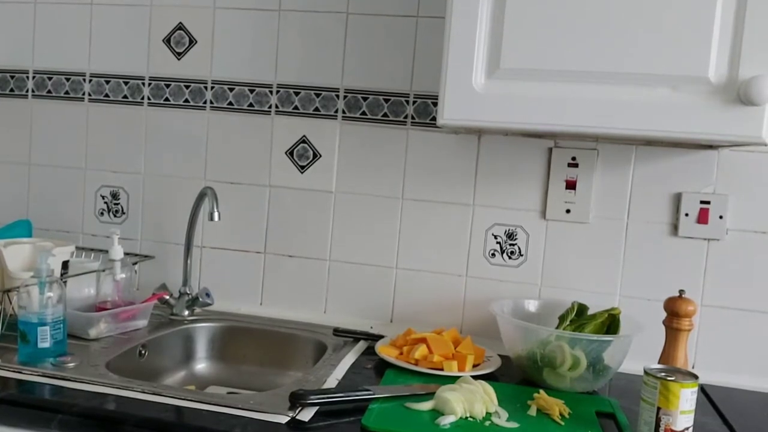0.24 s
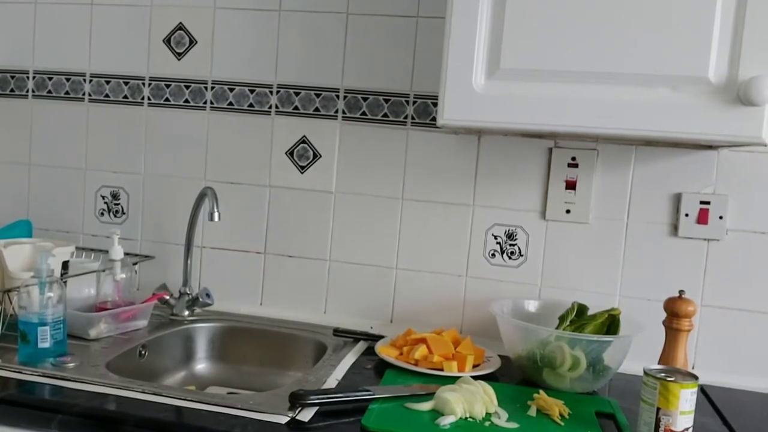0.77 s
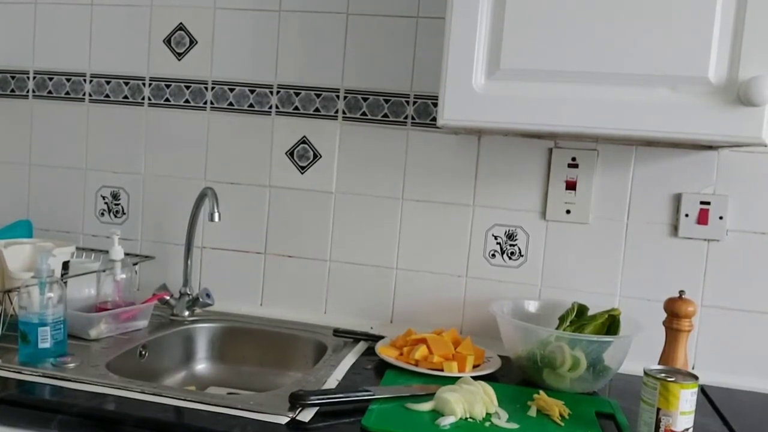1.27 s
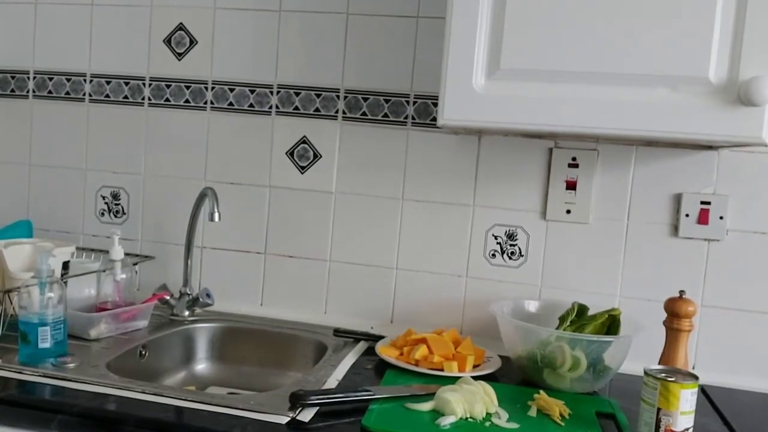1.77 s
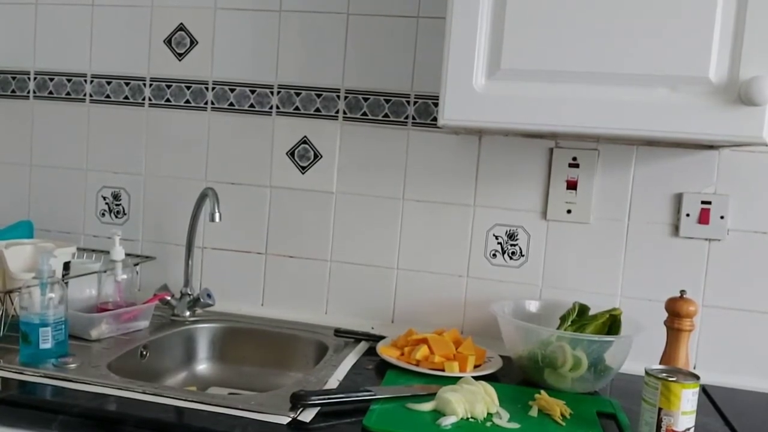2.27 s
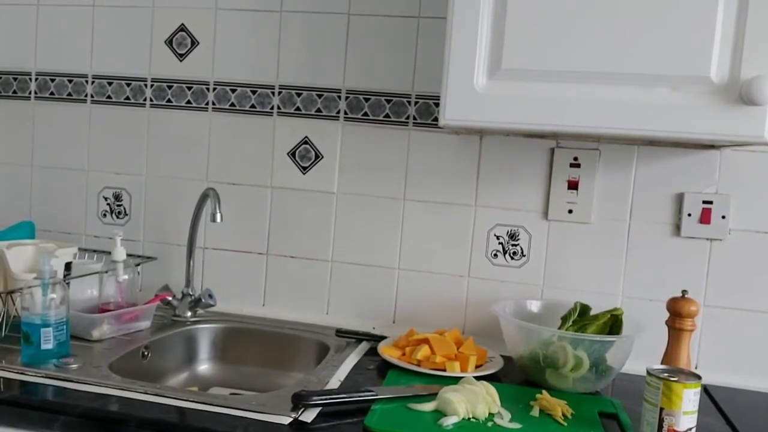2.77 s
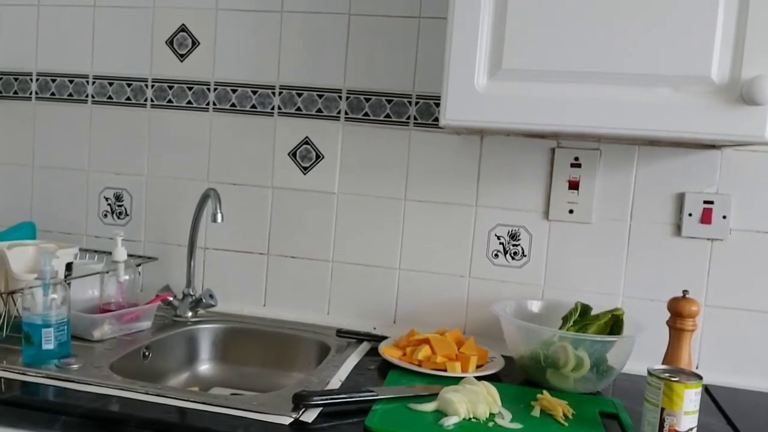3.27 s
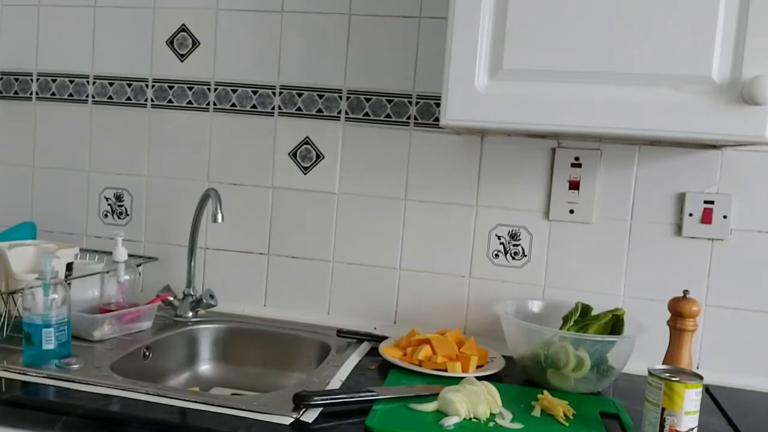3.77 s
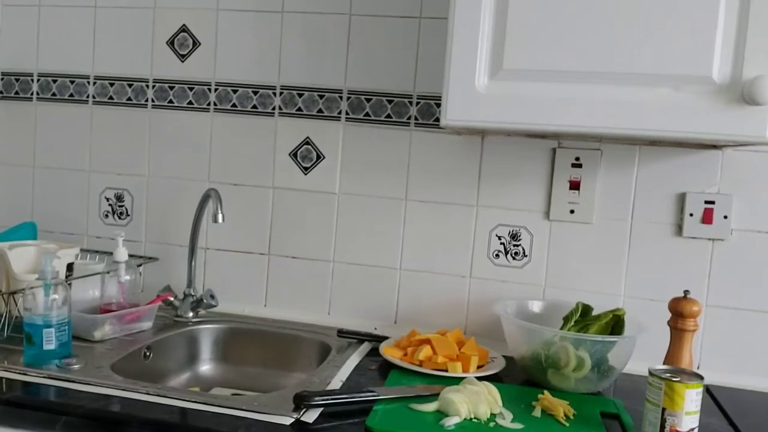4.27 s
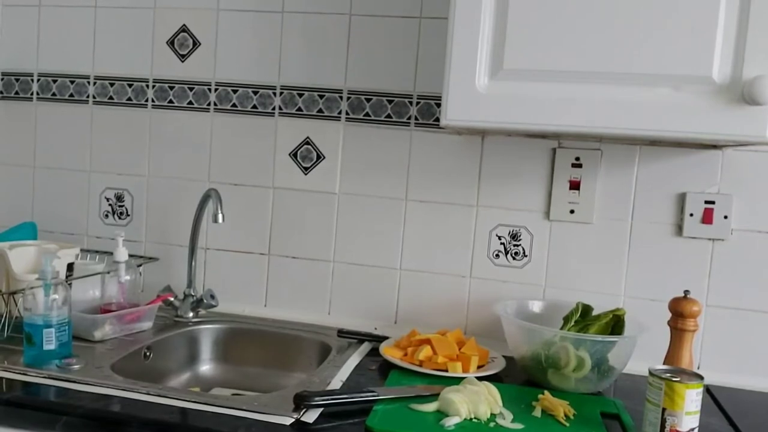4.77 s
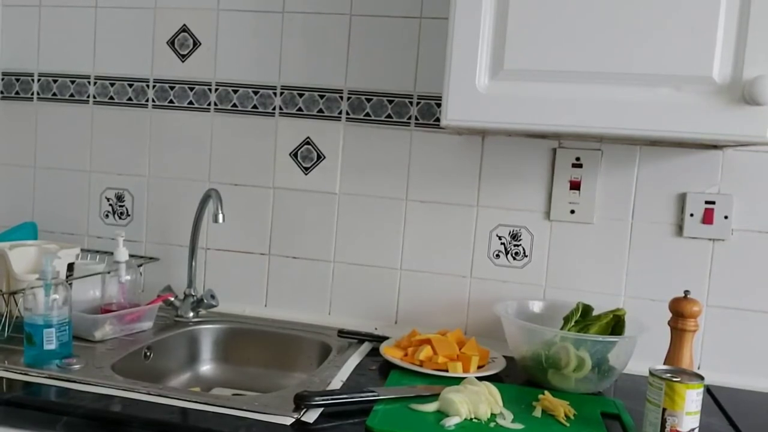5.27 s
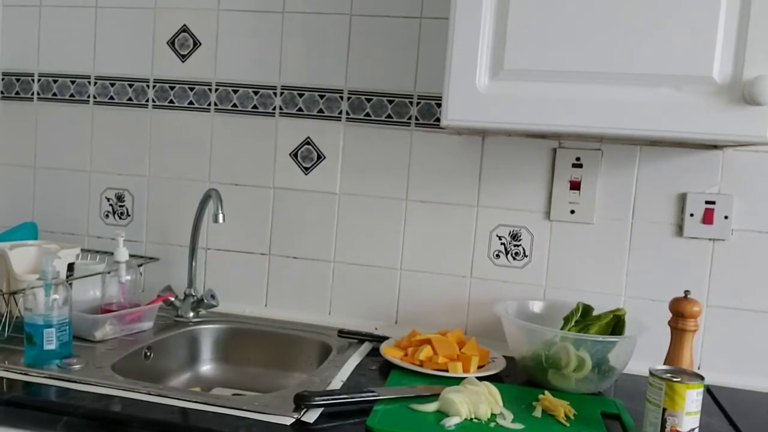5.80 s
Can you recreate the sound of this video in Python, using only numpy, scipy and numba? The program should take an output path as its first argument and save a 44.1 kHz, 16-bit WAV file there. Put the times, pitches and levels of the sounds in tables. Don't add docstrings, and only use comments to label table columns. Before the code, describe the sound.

Hollow wooden thumps with a quick chatter open the scene, then a pot lands lightly on the worktop. Dry grains crunch and trickle around a plastic cup before rushing into the metal pot, brightest and loudest the first time. Two later pours are softer, the last landing on a bed of grain. Faint taps and bag shifts fill the gaps over very low room hiss, with a short bright tiled echo.

```python
import sys
import numpy as np
from scipy import signal
from scipy.fft import rfft, irfft
from scipy.io import wavfile
from numba import njit

SR = 44100
rng = np.random.default_rng(int(sys.argv[2]) if len(sys.argv) > 2 else 0)


def transcribe(signal):
    frames = np.atleast_2d(signal).T
    limited = np.clip(frames, -1, 1)
    pcm = np.round(limited * 32767).astype(np.int16)
    wavfile.write(sys.argv[1], SR, pcm)


def rack_gain(trim_db):
    fader = np.asarray(trim_db, float)
    return 10 ** (fader / 20)


N = 266364
GRID = 20


def level(x, db, lo_hz=20, hi_hz=20000):
    hz = np.fft.rfftfreq(x.shape[-1], 1 / SR)
    inside = (hz > lo_hz) & (hz < hi_hz)
    energy = np.sum(np.abs(rfft(x)[..., inside]) ** 2, -1)
    power = 2 * np.mean(energy) / x.shape[-1] ** 2
    return x * rack_gain(db) / np.sqrt(power)


def colour(x, shape, tilt_db=0):
    log_hz = np.log(np.fft.rfftfreq(4096, 1 / SR) + 1)
    hz, db = np.transpose(shape)
    db = np.interp(log_hz, np.log(hz), db, db[0] - 20, db[-1] - 30)
    db = db + tilt_db * np.clip(log_hz - np.log(500), -2, 4) / np.log(2)
    cepstrum = irfft(np.log(rack_gain(db)))
    cepstrum[1:2048] *= 2
    cepstrum[2049:] = 0
    return signal.fftconvolve(x, irfft(np.exp(rfft(cepstrum))))[:len(x)]


def ring(x, modes):
    t = np.arange(SR // 2) / SR
    response = sum(rack_gain(db) * np.sin(2 * np.pi * hz * t) * 1000. ** (-t / t60) for hz, db, t60 in modes)
    return signal.fftconvolve(x, response)[:len(x)]


@njit
def hollow(x, hz, width):
    y, band, low = np.empty(len(x)), 0., 0.
    for i in range(len(x)):
        g, k = np.tan(np.pi * hz[i] / SR), width / hz[i]
        v = (band + g * (x[i] - low)) / (1 + g * (g + k))
        band, low, y[i] = 2 * v - band, low + 2 * g * v, k * v
    return y


def narrow(x, hz, width):
    return level(hollow(hollow(x, hz, width), hz, width), 0)


def grains(per_s, spread_db, size=N):
    chance = rng.random((3, size))
    hit = chance[0] < per_s / SR
    return hit * np.sign(chance[1] - .5) * rack_gain(-spread_db * np.log(chance[2] + 3e-3))


def read(rows):
    s, *columns = np.transpose(rows)
    return [np.interp(np.arange(N) / SR, s, c) for c in columns]


def swells(rows, roundness):
    s, db, rise, fall, last = np.transpose(rows)[:, :, None]
    t = np.arange(0, N + GRID, GRID) / SR - s
    away = np.minimum(np.abs(t) / np.where(t < 0, rise, fall), 9)
    return db - 20 * away ** roundness, last


def spread(coarse):
    return np.interp(np.arange(N), GRID * np.arange(len(coarse)), coarse)


def voiced(rows):
    db, hz = swells(rows, 1.3)
    power = rack_gain(2 * np.maximum(db, -200))
    return spread(np.sqrt(power.sum(0))), spread((power * hz).sum(0) / power.sum(0))


def sing(rows):
    db, hz = swells(rows, 1.9)
    t = np.arange(N) / SR
    wander = 0.039 * np.cumsum(rng.standard_normal((len(rows), N)), axis=1)
    return sum(spread(rack_gain(d + 2.5)) * np.sin(2 * np.pi * f * t + w) for d, f, w in zip(db, hz[:, 0], wander))


def bumps(events, modes, body, ring_db, damping, seats=(9,)):
    span = SR // 3
    out, t = np.zeros(N + span), np.arange(span) / SR
    choke_db, choke_s = -6, .008
    for s, db, length, tilt_db, low_db in events:
        chatter = grains(6000, 1.6, size=span) * np.sqrt(t / length) * np.exp(-t / length)
        struck = [(hz, g + low_db * (200 < hz < 380), t60 / damping) for hz, g, t60 in modes]
        thud = level(colour(chatter, body), 0) + level(ring(chatter, struck), ring_db)
        thud = colour(thud, [(1, 0), (SR, 0)], tilt_db)
        next_seat = min(q for q in seats if q > s)
        choke = rack_gain(choke_db * np.clip((s + t - next_seat) / choke_s, 0, 1))
        start = int(s * SR)
        out[start:start + span] += level(thud, db - 6) * choke
    return out[:N]


# frequency in Hz, density in dB per Hz.
AIR_SHAPE = [(25, -34.5), (70, -10), (170, -9.5), (400, -16.5), (1000, -20.5), (1700, -30.5), (5000, -27),
             (11900, -23), (16500, -33.5)]


def air():
    mid, side = (colour(rng.standard_normal(N), AIR_SHAPE) for _ in range(2))
    side = signal.sosfilt(signal.butter(1, 500, "high", fs=SR, output="sos"), side)
    return level(np.array([mid + side, mid - side]), -72.5)


# frequency in Hz, t60 in s.
ROOM_T60 = [(100, 0.15), (1000, 0.42), (6000, 0.73), (15000, 0.23)]


def echoes():
    t = np.arange(SR // 3) / SR
    tail = np.zeros((2, len(t)))
    room_hz, room_s = np.transpose(ROOM_T60)
    for hz in 29 * 2. ** np.arange(10):
        octave = signal.butter(2, [hz / 1.41, hz * 1.41], "band", fs=SR, output="sos")
        mid, side = signal.sosfilt(octave, rng.standard_normal((2, len(t))))
        t60 = np.interp(np.log(hz), np.log(room_hz), room_s)
        band = mid + np.clip(hz / 1000.0, .2, 1.05) * side * np.array([[1], [-1]])
        band = band * 1000. ** (-t / t60)
        band *= (1 - np.exp(-t / 0.0032)) * (1 + 4.7 * np.exp(-t / 0.024))
        tail += band * np.sqrt(hz / np.sum(band ** 2, 1, keepdims=True))
    return tail / np.sqrt(np.sum(tail ** 2) / 2)


def kitchen(x, wet_db, lag, pan_db, count, both_hz=30):
    turn = np.arange(N) / SR / .022
    wet = 0
    for k in range(count):
        share = 1
        if count > 1:
            share = np.cos(np.pi / 2 * np.clip((turn - k + count / 2) % count - count / 2, -1, 1))
        wet = wet + signal.fftconvolve(share * x[None], echoes())[:, :N]
    low = signal.sosfiltfilt(signal.butter(2, both_hz, fs=SR, output="sos"), x)
    late = low + np.roll(x - low, lag)
    direct = np.array([x * rack_gain(pan_db / 2), late * rack_gain(-pan_db / 2)])
    return (direct + rack_gain(wet_db) * wet) / np.sqrt(1 + rack_gain(2 * wet_db))


# start in s, level in dB, rattle length in s, brightness in dB per octave, big panel in dB.
DOOR_BUMPS = [(.198, -39.5, 0.0099, 4, -5.5), (.213, -29, 0.0029, 3, -4), (.218, -20, 0.0025, 2.5, -2.5),
              (.227, -20, 0.0041, 1, 11.5), (.235, -29.5, 0.0054, -0.5, 7), (.243, -26.5, 0.0021, -1.5, -6),
              (.254, -23.5, 0.0024, 2, -8), (.264, -30, 0.0034, 0, -7), (.275, -36, 0.002, -2.5, -6.5),
              (.294, -31, 0.0054, 2, 6), (.408, -28.5, 0.0031, 0, 8), (.418, -23.5, 0.0036, .7, -1),
              (.435, -33.5, 0.0018, -0.5, 2.5), (.447, -36, 0.0035, -2, -15), (.456, -31, 0.0057, 0.5, -18),
              (.489, -31, 0.0063, 1, -11), (.51, -39, 0.0061, -2.5, 5), (.521, -33.5, 0.0045, -0.5, 5),
              (.572, -35, 0.0015, -1.6, 7), (.7, -47, 0.0074, -2.3, 7), (.742, -44.5, 0.0053, -2.6, 1.5),
              (.77, -50.5, 0.01, -2.6, 8), (.84, -48, 0.016, -2.4, 2.5), (1.062, -54.5, 0.007, -2.6, 11)]
# frequency in Hz, density in dB per Hz.
DOOR_SHAPE = [(50, -36.5), (72, -12), (130, -9), (260, -18.5), (520, -2.5), (800, -9), (1200, -9.5),
              (1800, -12), (2500, -26), (3300, -35), (5000, -52.5), (8000, -58.5)]
DOOR_MODE_HZ = [70, 133, 328, 419, 502, 542, 670, 911, 1102, 1260, 1420, 1561, 1740, 2218]
# level in dB, t60 in s.
DOOR_MODE_RING = [(-20.5, 0.2), (-3, 0.14), (-8.5, 0.13), (-4, 0.12), (-6, 0.2), (-2, 0.2), (-5.5, 0.19),
                  (-24, 0.29), (-15.5, 0.12), (-14, 0.16), (-20.5, .15), (-23, 0.14), (-15, 0.08),
                  (-25, .2)]
DOOR_SEAT_S = [.306, .462, .532, .607, .725, 9]
# peak in s, level in dB, rise in s, fall in s, pitch in Hz.
BOX_NOTES = [(.24, -21.5, .03, 0.034, 330), (.3, -37.5, .04, 0.1, 328), (.43, -25.5, 0.031, 0.038, 328),
             (.52, -29.5, 0.048, 0.032, 330), (.587, -33, 0.036, 0.027, 328), (.24, -26.5, .022, 0.06, 515),
             (.28, -23, .04, 0.029, 542), (.36, -40.5, .05, 0.047, 535), (.44, -26.5, 0.038, 0.046, 510),
             (.51, -32, .035, 0.072, 502), (.576, -38.5, 0.0077, .08, 505), (.46, -33.5, .02, .025, 505)]


def cupboard():
    modes = [(hz, *how) for hz, how in zip(DOOR_MODE_HZ, DOOR_MODE_RING)]
    door = bumps(DOOR_BUMPS, modes, DOOR_SHAPE, -3.5, 0.86, DOOR_SEAT_S)
    door = kitchen(door, 0.5, lag=19, pan_db=.3, count=3, both_hz=480)
    pan_db = -4.5
    return door + sing(BOX_NOTES) * rack_gain(np.array([[pan_db], [-pan_db]]) / 2)


# start in s, level in dB, rattle length in s, brightness in dB per octave, low modes in dB.
POT_KNOCKS = [
    (.875, -37, 0.0043, 0.5, -1),
    (.886, -39, 0.0049, -0.5, 1),
    (.897, -36.5, 0.007, -2, 5),
    (.912, -40, 0.022, -1, 9),
]
# frequency in Hz, level in dB, t60 in s.
POT_MODES = [(235, -1.5, 0.14), (345, -2.5, 0.15), (648.3, 1, 0.21), (723, -4, 0.2), (1296, -3, 0.104),
             (1870, -1.5, 0.11), (2520, -13, 0.15), (3560, -20, .12), (4000, -12, 0.23), (5200, -3, 0.038),
             (5960, -20, 0.18), (7610, -14, 0.32)]
# frequency in Hz, density in dB per Hz.
POT_SHAPE = [(30, -39), (227, -21), (345, -2), (1500, -3.5), (2500, -20), (4190, -6), (4700, -23),
             (5300, -23), (8980, -14), (16000, -46)]
# start in s, level in dB, rattle length in s, brightness in dB per octave, low modes in dB.
CUP_TAPS = [
    (1.655, -51.5, 0.0092, -0.47, 10),
    (1.762, -59.5, 0.0056, -0.6, -1.5),
    (4.44, -48.5, 0.0083, 0.85, -3.5),
    (4.62, -56, 0.0046, 0.35, 0),
    (5.982, -48, 0.0095, -1.6, 1),
]
# frequency in Hz, level in dB, t60 in s.
CUP_MODES = [(476, -2, 0.1), (930, -15, 0.22), (1460, -7, 0.19), (1560, 3, 0.073), (1716.6, -10, 0.17),
             (1920, -39.5, 0.47)]
# frequency in Hz, density in dB per Hz.
CUP_SHAPE = [(35, -48), (60, 0), (255, -8.5), (400, 14.5), (606, -20), (1000, 9), (4500, -15), (5850, -58),
             (9900, -120)]
# peak in s, level in dB, rise in s, fall in s, pitch in Hz.
HANDLED_NOTES = [
    (1.5, -48.5, .15, 0.126, 511),
    (2.07, -65, 0.28, 0.051, 528),
    (2.23, -67.5, 0.129, 0.134, 388),
    (2.46, -73.5, 0.087, 0.075, 392),
    (2.87, -70, .08, 0.14, 185),
    (3.02, -64, 0.13, 0.19, 182),
    (3.12, -47.5, 0.088, 0.049, 303),
    (3.12, -52, 0.16, 0.074, 418),
]
# peak in s, level in dB, rise in s, fall in s, pitch in Hz.
STRUCK_NOTES = [(.905, -41, .03, 0.087, 1895), (0.97, -54, .06, .07, 1895), (.9, -45, 0.021, .08, 4080),
                (0.953, -49, .03, .035, 4050), (.879, -46.5, 0.0046, .04, 5100),
                (.885, -50.5, 0.0072, 0.16, 2620), (.89, -45, 0.013, .07, 4500),
                (.9, -51, 0.021, .08, 5879), (.895, -41, 0.018, 0.091, 660), (2.54, -44, .03, .09, 7237),
                (2.535, -40, .03, .12, 4600), (2.54, -50, .03, 0.11, 3820), (2.535, -42.5, 0.027, .1, 5200),
                (2.55, -44, .04, 0.088, 820)]


def pot_and_cup():
    knocks = bumps(POT_KNOCKS, POT_MODES, POT_SHAPE, -1.5, 1.0)
    taps = bumps(CUP_TAPS, CUP_MODES, CUP_SHAPE, -2.9, 0.62)
    struck = kitchen(knocks + taps, 0.34, lag=15, pan_db=4.0, count=1, both_hz=450)
    peal = kitchen(sing(STRUCK_NOTES), -6.0, lag=19, pan_db=1.0, count=1)
    return struck + sing(HANDLED_NOTES) + peal


# start in s, level in dB, pitch in Hz, length in s.
BAG_SLUMPS = [
    (0, -63, 177, 0.032),
    (1.412, -58.5, 130, 0.038),
    (1.63, -54.5, 170, 0.023),
    (1.737, -50, 216, 0.0439),
    (2.805, -53.5, 303, 0.0093),
    (3.065, -61, 146.8, 0.021),
    (3.084, -53, 303.5, 0.017),
    (4.68, -57, 169, 0.06),
    (4.906, -64.5, 273.3, 0.0634),
    (5.976, -56, 109, 0.067),
]


def slumps():
    out, noise = np.zeros(N), rng.standard_normal(N)
    for s, db, hz, length in BAG_SLUMPS:
        t = np.clip(np.arange(N) / SR - s, 0, None) / length
        out += rack_gain(db + 5.0) * t * np.exp(-t) * narrow(noise, np.full(N, 1. * hz), 90.0)
    return out


BAG_MOVES = [
    (0.0, -60.5, 0.033, 1.01, 0),
    (.192, -50, 0.24, 0.098, -6.5),
    (.222, -51, 0.035, 0.07, 4),
    (.39, -58, 0.29, 1.22, 4),
    (.878, -40, 0.0046, 0.032, 5),
    (.9, -47.5, 0.017, 0.14, 3.5),
    (1.114, -62, .1, 0.069, -13),
    (1.23, -83, 0.17, 0.11, 3.5),
]
POT_POURS = [(2.33, -57, 0.0013, 0.046, -20), (2.435, -58, 0.077, .05, -27),
             (2.455, -34.5, 0.0014, 0.02, -41), (2.47, -42.5, 0.008, .3, -21),
             (2.502, -25.5, .004, 0.046, -23.5), (2.512, -12.5, 0.016, 0.074, -18),
             (2.556, -22, 0.049, 0.28, -15), (2.866, -35.5, 0.039, 0.046, -16),
             (4.045, -74, 0.0058, 0.094, -21.5), (4.12, -59, 0.039, .03, -22.5),
             (4.163, -31, .012, .03, -17), (4.172, -24.5, 0.021, 0.16, -13), (4.275, -30, 0.078, 0.06, -12),
             (4.31, -29.5, 0.15, 0.11, -19.5)]
BED_POURS = [
    (5.403, -59.5, .003, 0.085, -26.5),
    (5.843, -24.5, 0.083, .12, -28),
    (5.955, -36.5, .15, 0.14, -30),
]
CUP_SCOOPS = [(1.39, -57, 0.098, 0.32, 2), (1.526, -54.5, 0.21, 0.21, 1), (1.69, -55.5, 0.22, 0.059, 0.5),
              (1.92, -54.5, 0.079, 0.15, -1), (2.05, -60.5, 0.093, 0.074, -2), (3.0, -46.5, 0.054, .1, -6),
              (3.12, -47.5, 0.14, 0.15, 0.5), (3.5, -55, 0.15, 0.2, -5.5), (4.454, -55.5, 0.054, 0.078, 1),
              (4.59, -61.5, 0.17, 0.023, 1), (4.62, -43, 0.015, 0.082, -4), (4.762, -41, 0.17, 0.1, 1.04),
              (4.95, -52, 0.27, 0.18, -4), (5.07, -51, 0.1, 0.18, -4), (5.2, -61, 0.12, 0.17, -1.5),
              (5.76, -46.5, 0.075, 0.097, -2.5)]
LOOSE_TRICKLES = [
    (1.785, -48, 0.073, 0.084, -7.5),
    (1.855, -49, 0.11, 0.073, -7),
    (3.386, -55.5, 0.2, 0.18, -5.5),
    (3.68, -64.5, .1, 0.14, -20),
    (3.82, -63.5, 0.18, 0.1, -42),
    (3.86, -71.5, 0.066, 0.029, -26.5),
    (5.34, -67, 0.082, 0.27, -14),
    (5.62, -66, .06, 0.095, -17.5),
    (5.69, -61, 0.062, 0.028, -18.5),
    (5.715, -44, 0.015, 0.13, -9.5),
]
# swell roundness, wall in dB at packing 0, wall dB per packing dB, bulk in dB at packing 0,
# bulk dB per packing dB.
BAG_MANNER = (0.88, -3.5, 0.77, 0.1, 2.5)
POUR_MANNER = (1.19, -3, 0.6, 1.5, 2.5)
BED_MANNER = (1.16, -20, 0, -1, 1.1)
SCOOP_MANNER = (1.46, 0.28, 0.69, 0.59, 3.2)
TRICKLE_MANNER = (2.5, -4.5, 0.0942, 6, 2.5)
GESTURES = [(BAG_MOVES, BAG_MANNER), (POT_POURS, POUR_MANNER), (BED_POURS, BED_MANNER),
            (CUP_SCOOPS, SCOOP_MANNER), (LOOSE_TRICKLES, TRICKLE_MANNER)]
SPRAY_DB = [-20.5, -11, -16, -5.5, -6]


def flow():
    power = 0
    for (rows, manner), spray_db in zip(GESTURES, SPRAY_DB):
        roundness, wall_db, wall_per, bulk_db, bulk_per = manner
        db, packing = swells(rows, roundness)
        flat = 0 * packing
        layers = flat, wall_db + wall_per * packing, packing, bulk_db + bulk_per * packing, spray_db + flat
        power = power + np.array([rack_gain(2 * db).T @ rack_gain(2 * layer[:, 0]) for layer in layers])
    return [spread(np.sqrt(p)) for p in power]


# frequency in Hz, density in dB per Hz.
TICK_SHAPE = [(4200, -37), (5200, -18), (6700, -20), (7600, 0), (8700, 7.5), (11400, 12), (14000, 7.5),
              (15700, 4), (17000, 1.5)]
CRUNCH_SHAPE = [(710, -12.5), (1200, -9), (1470, -10.5), (1790, -9.5), (3300, -13), (4290, -32),
                (7260, -120)]
WALL_SHAPE = [(1500, -45.5), (2500, -16), (3500, 0.5), (4720, -1.5), (6800, -3.5), (8840, -30),
              (15000, -120)]
BULK_SHAPE = [(24, -59), (40, -25.5), (267, -8.5), (297, 0), (337, -1), (511, 4.5), (578, -9), (717, 0),
              (1090, -10.5), (1600, -42), (2080, -51.5), (3520, -120)]
# frequency in Hz, width in Hz, level in dB.
WALL_MODES = [(3810, 32, -5), (4320, 76, -4.5), (4565, 66, 3), (4980, 26, -2), (5283, 110, -3),
              (5610, 49, 1.5), (6213, 40, -9.5), (6990, 190, -0.5), (7400, 42, -5.5), (7460, 40, -2.5)]
# time in s, level in dB re a plain grain.
HARD_GRAINS = [(2.509, 12), (2.513, 14.5), (2.5162, 20), (2.518, 14.5), (2.5426, 12), (2.551, 14),
               (2.556, 14.5), (2.574, 13), (4.1626, 13), (4.1736, 13.5), (4.1764, 11.5), (4.188, 13),
               (4.198, 12.5), (4.205, 14)]
# peak in s, level in dB, rise in s, fall in s.
LOW_THUMPS = [
    (0.0, -81.5, 0.102, .45),
    (0.221, -27, 0.0063, .04),
    (.408, -39, 0.052, 0.21),
    (.78, -47.5, 0.148, 0.023),
    (0.877, -31.5, 0.0056, 0.028),
    (.9, -57.5, .021, 0.157),
]
# peak in s, level in dB, rise in s, fall in s, centre in Hz.
HOLLOW_SWELLS = [(1.2, -66, .15, .21, 470.3), (1.444, -40.5, .07, 0.11, 471.6),
                 (1.55, -55.5, 0.089, .21, 504.4), (1.692, -49.5, .15, 0.11, 476),
                 (2.06, -60, .3, .08, 489), (2.3, -68, 0.22, .2, 349.4), (2.52, -27.5, 0.024, 0.13, 619),
                 (2.63, -31, 0.11, 0.11, 501), (2.844, -48, 0.11, 0.09, 490.5),
                 (3.12, -51.5, 0.13, .1, 420), (3.24, -55, 0.068, .1, 431.8),
                 (3.386, -58.5, 0.11, 0.089, 459), (3.73, -70, .1, 0.088, 703.2),
                 (4.215, -30, 0.047, 0.058, 463.7), (4.29, -38, 0.085, 0.1, 498.4),
                 (4.44, -58.5, .05, 0.13, 550), (4.76, -40.5, 0.11, 0.17, 477),
                 (4.981, -50.5, .05, .06, 410.4), (5.085, -58.5, .06, 0.22, 691),
                 (5.73, -44.5, .04, .12, 457.5), (5.843, -41, 0.1, .07, 503.4),
                 (6.04, -39.5, .1, .1, 425.5)]
# time in s, level in dB, centre in Hz.
LIP_SLIDE = [
    (1.7, -84, 1980),
    (1.756, -65, 2010),
    (1.768, -45, 1870),
    (2.022, -53.5, 2250),
    (2.332, -68.5, 2290),
]
# peak in s, level in dB, rise in s, fall in s, centre in Hz.
CUP_HUM = [
    (1.934, -68.5, 0.337, 0.052, 938),
    (2.06, -72.5, 0.04, 0.44, 943),
    (4.452, -57, 0.056, 0.063, 971),
    (4.57, -58.5, 0.029, 0.1, 956),
    (4.72, -70, 0.106, 0.046, 949.5),
    (5.07, -68.5, 0.233, 0.26, 930),
    (5.68, -77.5, 0.44, .04, 990),
]


def rice():
    tick_gain, wall_gain, crunch_gain, bulk_gain, spray_gain = flow()
    jolts = [(*row, 420) for row in LOW_THUMPS]
    hollow_gain, hollow_hz = voiced(jolts + HOLLOW_SWELLS)
    bulk_gain = np.hypot(bulk_gain, rack_gain(-3.5) * voiced(jolts)[0])

    hail, slide = grains(9000, 2.4), grains(2500, 3.2)
    hard_s, hard_db = np.transpose(HARD_GRAINS)
    hail[(hard_s * SR).astype(int)] = rack_gain(hard_db)

    tick = level(colour(hail, TICK_SHAPE), 0, 8200, 13000)
    struck = np.clip(np.sqrt(tick_gain * rack_gain(22)), rack_gain(-14), rack_gain(1))
    modes = [(hz, db, 2.9 / width) for hz, width, db in WALL_MODES]
    wall = level(colour(hail, WALL_SHAPE), 0.58) + struck * level(ring(hail, modes), -4.0)
    crunch = level(colour(hail + slide, CRUNCH_SHAPE), 0, 900, 3200)
    bulk = level(colour(slide, BULK_SHAPE), 0, 200, 1400)
    cavity = hollow_gain * rack_gain(-5.0) * narrow(slide, hollow_hz, 180.0)

    lip_db, lip_hz = read([(1.6, -95, 1900), *LIP_SLIDE, (2.5, -95, 2300)])
    lip = rack_gain(lip_db - 7.0) * narrow(hail, lip_hz, 750.0)
    hum_gain, hum_hz = voiced(CUP_HUM)
    hum = hum_gain * rack_gain(5.0) * narrow(slide, hum_hz, 220.0)
    spray = narrow(hail, np.full(N, 6061.5), 2200)

    loose = tick_gain * tick + wall_gain * wall + spray_gain * spray
    packed = crunch_gain * crunch + bulk_gain * bulk
    return loose + packed + cavity + lip + hum


def scene():
    grain = kitchen(rice() + slumps(), 6.5, lag=17, pan_db=1.5, count=8)
    return air() + cupboard() + pot_and_cup() + grain


def band_limit(x):
    return signal.sosfilt(signal.butter(12, 15790, fs=SR, output="sos"), x)


def record(dry):
    mix = signal.sosfilt(signal.butter(2, 58, "high", fs=SR, output="sos"), dry)
    mix = np.tanh(.45 * mix) / .45
    mix = signal.sosfilt(signal.ellip(14, .2, 70, 15730, fs=SR, output="sos"), mix)
    return band_limit(mix)


dry = scene()
out = record(dry)
transcribe(out)
```